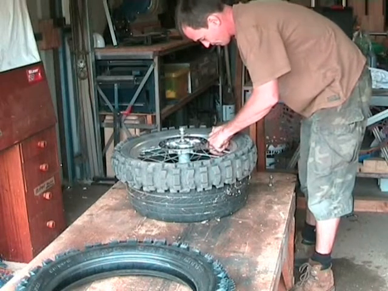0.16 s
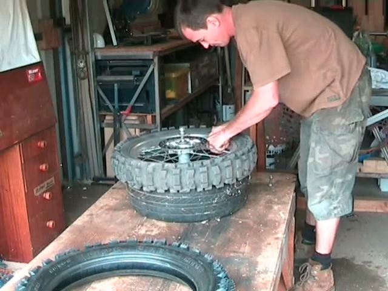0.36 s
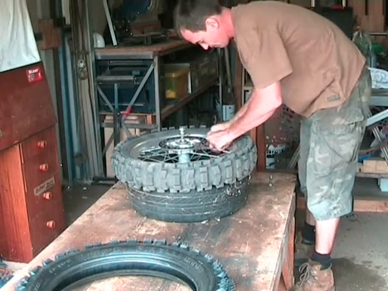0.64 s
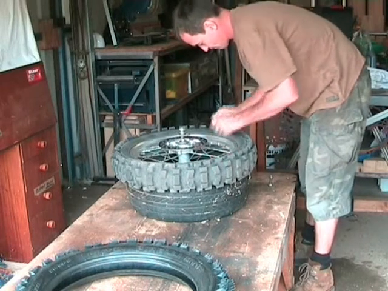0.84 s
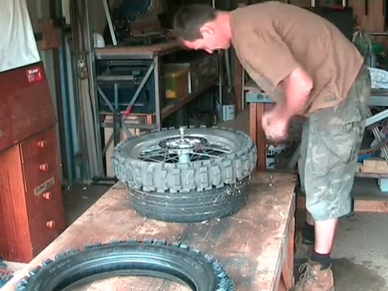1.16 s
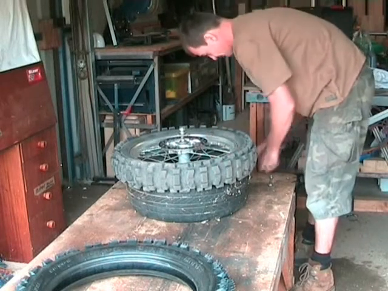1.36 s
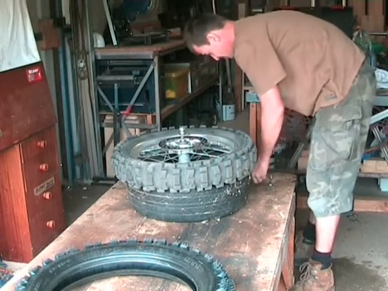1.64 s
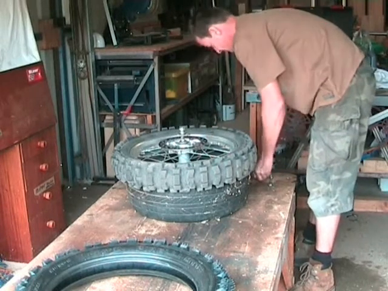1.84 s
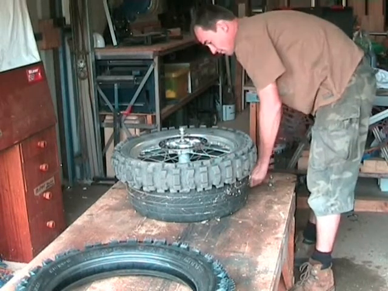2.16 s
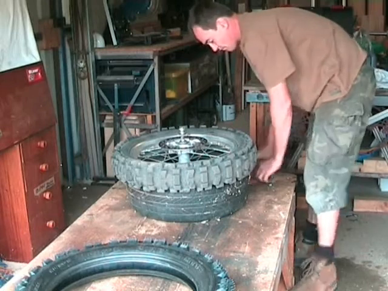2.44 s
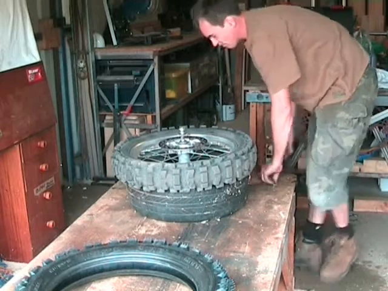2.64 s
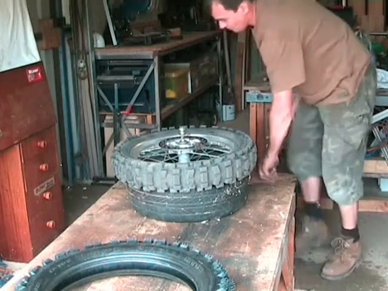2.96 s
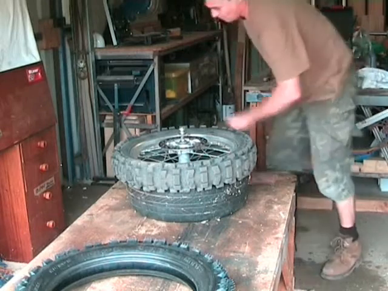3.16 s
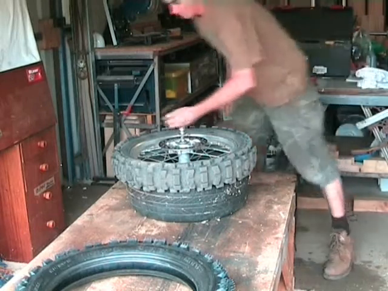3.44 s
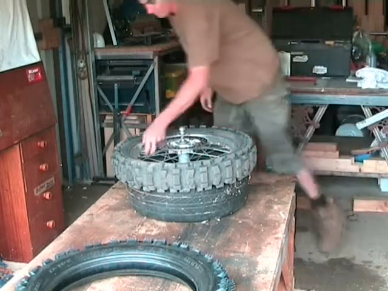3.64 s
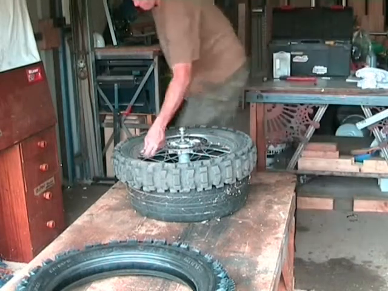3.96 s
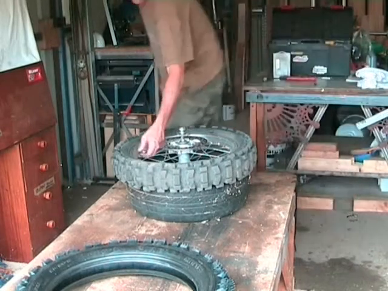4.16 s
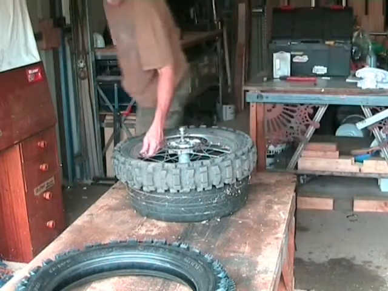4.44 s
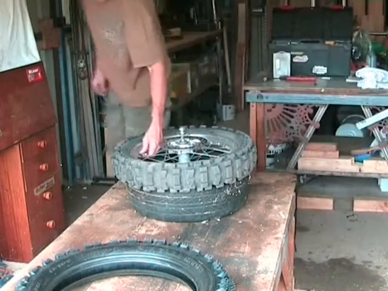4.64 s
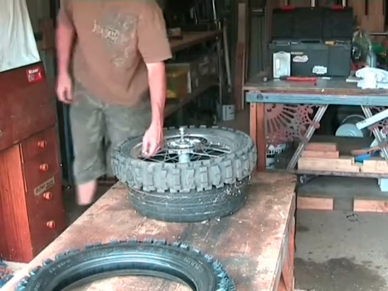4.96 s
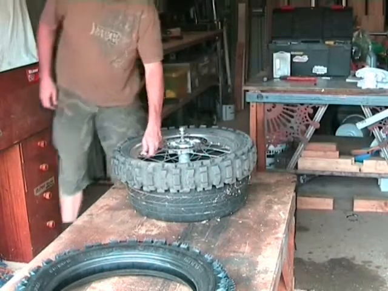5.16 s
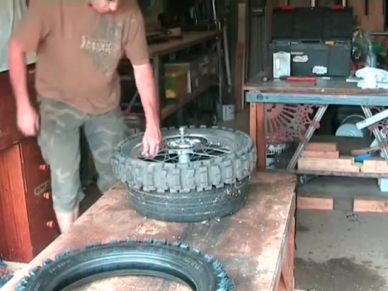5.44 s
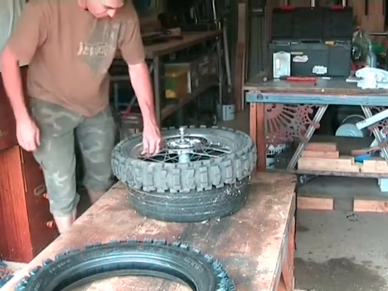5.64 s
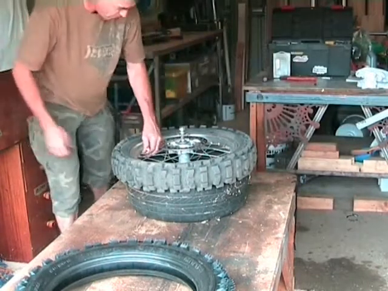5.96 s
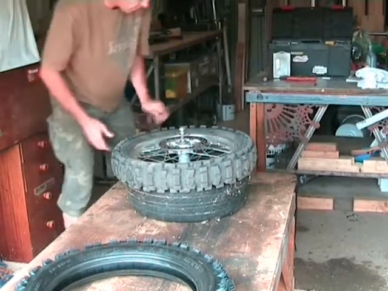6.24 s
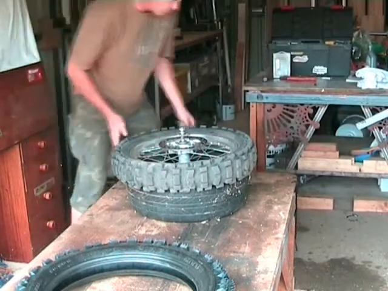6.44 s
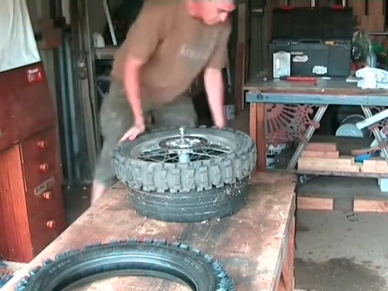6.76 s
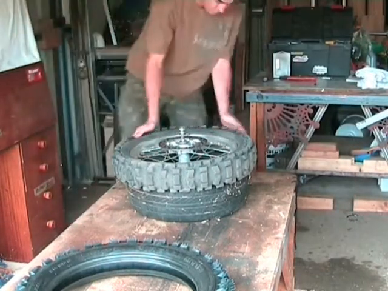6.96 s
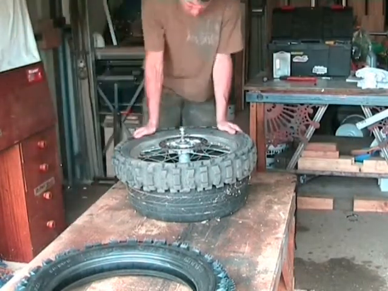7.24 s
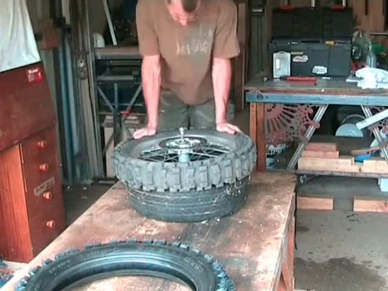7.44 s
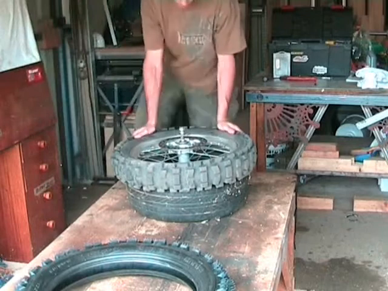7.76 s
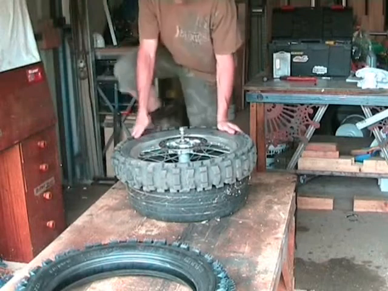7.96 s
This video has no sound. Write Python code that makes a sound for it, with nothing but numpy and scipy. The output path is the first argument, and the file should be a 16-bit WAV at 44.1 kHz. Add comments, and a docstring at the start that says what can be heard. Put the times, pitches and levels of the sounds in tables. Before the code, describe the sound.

In a small workshop, fingers open a tyre valve and air spurts out in rough, breathy bursts with low puffs buffeting the close stereo microphone. The hiss runs free, then fades and dulls into a thin high whistle. A few faint wooden knocks follow. Near the end a hard object topples with a quick bouncing clatter and short metallic squeal, then the tyre is pressed and the whistle swells slightly.

```python
"""Air hisses out of the open valve of a tyre on a wooden workbench: shaped noise fading to a few thin sines.
At first fingers deflect the jet into rougher noise and low puffs of air buffet the microphone.
Light knocks follow, and near the end something hard topples and clatters: noise crunches with ringing modes.
Sliding metal squeals in wavering sines, hands and clothes brush in soft noise, the tyre is bumped,
and a small workshop adds its echoes, steady noise and a low rumble."""
import sys
import numpy as np
from scipy import signal
from scipy.fft import rfft, irfft, next_fast_len
from scipy.io import wavfile
from scipy.ndimage import uniform_filter1d

SR = 44100
rng = np.random.default_rng(int(sys.argv[2]) if len(sys.argv) > 2 else 0)


def dump_mix(stems):
    """Bounce the given channels to the path in sys.argv[1] as a 16-bit WAV at rate SR."""
    frames = np.atleast_2d(stems).T  # one column per channel
    limited = np.clip(frames, -1, 1)  # hard clip at full scale
    pcm = np.round(limited * 32767).astype(np.int16)
    wavfile.write(sys.argv[1], SR, pcm)


N = 356813
T = np.arange(N) / SR

# colour of the low noise in rumble and background: f/Hz, level/dB
LOW_COLOUR = [(20, -31), (55, -11.5), (120, -1.5), (240, -3), (420, -13), (2000, -60)]
# colour of blows by the falling thing and against the tyre: f/Hz, level/dB
BLOW_COLOUR = [(40, -49), (130, -20), (280, 2), (370, -3.5), (620, 5), (900, 0.5), (2500, -1), (4200, -2.5),
               (7000, 4), (13000, -14)]
# ringing modes of those blows: f/Hz, level/dB, t60/s
BODY_RING = [(285.4, -7.5, 0.24), (510, -1.5, 0.2), (780, -4, .15), (1103, -1.5, 0.16), (1490, -5, .16),
             (1592, 0.5, 0.28), (2323, -2.5, 0.17), (3710, -13, .33)]


def amp(db):
    """Decibels to gain."""
    return 10 ** (np.asarray(db) / 20)


def unit(x):
    """Scales to rms 1."""
    return x / np.sqrt(np.mean(x ** 2) + 1e-20)


def at_time(rows, t=T):
    """Reads every column of a curve over time."""
    times, *columns = np.transpose(rows)
    return [np.interp(t, times, column) for column in columns]


def at_hz(rows, hz):
    """Reads a spectrum on a log-frequency axis."""
    f, value = np.transpose(rows)
    return np.interp(np.log(hz + 1), np.log(f + 1), value)


def resonance(hz, centre_hz, width_hz):
    """Bell-shaped peak of height 1."""
    return 1 / (1 + (2 * (hz - centre_hz) / width_hz) ** 2)


def noise(gain, size=N):
    """Noise of rms 1 whose spectrum follows gain(Hz)."""
    n = next_fast_len(size)
    spectrum = rfft(rng.standard_normal(n)) * gain(np.fft.rfftfreq(n, 1 / SR))
    return unit(irfft(spectrum, n)[:size])


def coloured(colour, size=N):
    """Noise of rms 1 with a tabled spectrum."""
    return noise(lambda hz: amp(at_hz(colour, hz)), size)


def wander(rate_hz):
    """Random fluctuation of rms 1, mostly slower than rate_hz."""
    return noise(lambda hz: 1 / (1 + (hz / rate_hz) ** 2))


def tone(hz, waver_hz):
    """A sine of rms 1 whose pitch trembles."""
    pitch_hz = hz + waver_hz * wander(38.5)
    return unit(np.sin(2 * np.pi * np.cumsum(pitch_hz) / SR))


def envelope(rows, attack_s, release_s):
    """Gain of events (start, length, dB) that rise linearly, hold and die away exponentially."""
    gain = np.zeros(N)
    for s, length_s, db in rows:
        attack = np.clip((T - s) / attack_s, 0, 1)
        gain += amp(db) * attack * np.exp(-np.maximum(T - s - length_s, 0) / release_s)
    return gain


def add(mix, s, sound):
    """Mixes a sound in at time s."""
    part = mix[round(s * SR):][:len(sound)]
    part += sound[:len(part)]


def low_cut(x, corner_hz):
    """Cuts the deep bass below corner_hz."""
    return signal.sosfilt(signal.butter(2, corner_hz, "highpass", fs=SR, output="sos"), x)


def ports(a, b):
    """Two unrelated signals become a close microphone pair: alike in the bass, apart in the treble."""
    # f/Hz, likeness of the two ports/0-1
    likeness = [(100, 1), (300, 0.92), (700, 0.77), (1400, 0.95), (2800, 0.6), (13000, 0.1)]
    n = next_fast_len(len(a))
    same = np.clip(at_hz(likeness, np.fft.rfftfreq(n, 1 / SR)), 0, 1)
    mid = rfft(a, n) * np.sqrt((1 + same) / 2)
    side = rfft(b, n) * np.sqrt((1 - same) / 2)
    return irfft(np.array([mid + side, mid - side]), n)[:, :len(a)]


def room(x, early_db, tail_db, early_s, lag_samples):
    """Direct sound, reaching the right port first, then nearby reflections and the workshop's tail."""
    # the workshop's decay: f/Hz, t60/s
    decay = [(150, 0.58), (500, 0.35), (2500, 0.41), (7000, 0.77), (13000, 0.39)]
    size = SR // 2
    t = np.arange(size) / SR
    # sparse random reflections, about 2500 a second, after a short gap
    taps = rng.choice([-1., 1.], (4, size)) * (rng.random((4, size)) < 2500 / SR) * (t > .0015)
    early = ports(*taps[:2]) * np.exp(-t / early_s)
    hz, frame_s, z = signal.stft(ports(*taps[2:]), SR, nperseg=256)
    fade = np.exp(-np.log(1000) * frame_s / at_hz(decay, hz)[:, None])
    tail = signal.istft(z * fade, SR, nperseg=256)[1][:, :size]
    echo = amp(early_db) * early / np.linalg.norm(early[0])
    echo += amp(tail_db) * tail / np.linalg.norm(tail[0])
    # the direct sound, with a fractional delay at the left port
    echo[:, :16] += np.sinc(np.arange(16) - 8 - np.array([[lag_samples], [0]]))
    return signal.fftconvolve(x[None], echo / np.linalg.norm(echo[0]), axes=1)[:, :N]


def widened(pair):
    """Scales the difference between the ports: the hiss starts narrow and spreads."""
    # t/s, gain of the difference/dB
    width = [(1.6, -5.5), (2.0, 4.5), (5.0, 4), (8.09, 3)]
    mid = (pair[0] + pair[1]) / 2
    side = (pair[0] - pair[1]) / 2 * amp(at_time(width)[0])
    return np.array([mid + side, mid - side])


def background(level_db=-50, rise_db_per_s=0.58, whirr_db=-55.5):
    """The workshop's noise slowly comes up, with a faint narrow band and low noise opposed at the ports."""
    # colour of the steady noise: f/Hz, level/dB
    ambience = [(20, -16), (130, 3.5), (1000, -1), (1600, -10), (8000, -23.5), (13000, -30)]
    # colour of the faint narrow band: f/Hz, level/dB
    whirr = [(800, -9.5), (1250, -1.5), (1600, -21), (5000, -50)]
    # low opposed noise: t/s, level/dB
    low_spread = [(2.6, -69), (5.5, -47.5), (8.09, -45)]
    opposed = amp(whirr_db) * coloured(whirr) + amp(at_time(low_spread)[0]) * coloured(LOW_COLOUR)
    steady = ports(coloured(ambience), coloured(ambience)) * amp(level_db + rise_db_per_s * T)
    return steady + np.array([opposed, -opposed])


def rumble(lumpy_db=1.0):
    """An uneven low rumble comes and goes in the second half."""
    # start/s, length/s, level/dB
    rumbles = [(4.5, 3.4, -50.5), (5.04, 0.073, -49), (5.7, 0.31, -48.5)]
    lumps = unit(amp(lumpy_db * wander(18)))
    return coloured(LOW_COLOUR) * envelope(rumbles, attack_s=0.063, release_s=0.19) * lumps


def buffet(gust_db=2.8, opposed_db=-2.0, corner_hz=90, still_db=-75, puff_s=0.021):
    """Lumpy low puffs of moving air; the deepest eddies push the two ports in opposite senses."""
    # colour of the moving air: f/Hz, level/dB
    air_colour = [(20, -32), (50, -4), (110, 3), (220, -3), (400, -15.5), (2000, -84)]
    # draught under the puffs, dying away as the jet weakens: start/s, length/s, level/dB
    draughts = [(0.43, 2.14, -51.5)]
    # t/s, level/dB, opposed against common motion/dB
    puffs = [(.39, -44, 11), (.53, -47, 13), (.645, -37, 2), (.8, -31.5, 3), (.865, -36, 0.5),
             (.93, -39.5, 3), (1.02, -41, -3), (1.145, -42.5, 1), (1.21, -39.5, -1), (1.303, -38.5, -1),
             (1.495, -39, -1), (1.625, -38.5, 3), (1.68, -41, 4)]
    common_power = amp(still_db) ** 2 + envelope(draughts, attack_s=0.16, release_s=0.19) ** 2
    opposed_power = common_power * amp(opposed_db) ** 2
    for s, db, against_db in puffs:
        puff = amp(db) ** 2 * np.exp(-((T - s) / puff_s) ** 2)
        common_power = common_power + puff
        opposed_power = opposed_power + puff * amp(against_db) ** 2

    def deep_colour(hz):
        return amp(at_hz(air_colour, hz)) * (1 + 3 / (1 + (hz / corner_hz) ** 4))

    gusts = unit(amp(gust_db * wander(29)))
    common = coloured(air_colour) * np.sqrt(common_power)
    opposed = noise(deep_colour) * np.sqrt(opposed_power)
    return gusts * np.array([common + opposed, common - opposed])


def brushing():
    """Hands and clothes brush past in short washes of bright noise."""
    # f/Hz, level/dB
    brush_colour = [(200, -24), (1500, 18), (10500, 16), (13000, -13.5)]
    # start/s, length/s, level/dB
    brushes = [(6.645, 0.015, -36), (7.44, 0.06, -44)]
    return coloured(brush_colour) * envelope(brushes, attack_s=0.011, release_s=0.04)


def blows(rows, colour, ring_modes, ring_db, detune, rise_s, rattle_db, rattle_s, spot_db, spot_width_hz):
    """Each blow is a crunch and grainy rattle, coloured by the struck spot, plus the whole body's ring."""
    out = np.zeros(N)
    t = np.arange(SR // 2) / SR
    mode_hz, mode_db, t60 = np.transpose(ring_modes)[:, :, None]
    for s, db, edge_hz, contact_s, spot_hz in rows:
        chatter = unit(noise(lambda hz: 1 / (1 + (hz / 150) ** 4), len(t)) ** 2)
        contact = np.exp(-t / contact_s) + amp(rattle_db) * chatter * np.exp(-t / rattle_s)

        def struck_colour(hz):
            peak_db = spot_db * resonance(hz, spot_hz, spot_width_hz)
            return amp(at_hz(colour, hz) + peak_db) / np.sqrt(1 + (hz / edge_hz) ** 8)

        crunch = noise(struck_colour, len(t)) * contact
        # a longer contact carries more energy
        crunch *= np.sqrt(contact_s * SR / 2) / np.linalg.norm(crunch)
        struck_hz = mode_hz * (1 + detune * rng.standard_normal(mode_hz.shape))
        swing = np.sin(2 * np.pi * (struck_hz * t + rng.random(mode_hz.shape)))
        ring = (amp(mode_db) * np.exp(-np.log(1000) * t / t60) * swing).sum(0)
        add(out, s, amp(db) * (crunch + amp(ring_db) * ring) * (1 - np.exp(-t / rise_s)))
    return out


def bumps():
    """Dull bumps against the tyre, with hardly any ring."""
    # t/s, relative level/dB, upper edge f/Hz, contact decay/s, struck spot f/Hz
    hits = [(6.665, -19.5, 3050, 0.0067, 695), (7.414, -34.5, 2450, 0.014, 690),
            (7.484, -19, 2360, 0.0076, 2080)]
    return amp(2.0) * blows(hits, BLOW_COLOUR, BODY_RING, ring_db=-34, detune=0.03, rise_s=0.0014,
                            rattle_db=-28, rattle_s=0.025, spot_db=11, spot_width_hz=120)


def knocks():
    """Small things put down on the bench excite its short wooden ring."""
    # t/s, relative level/dB, upper edge f/Hz, contact decay/s, struck spot f/Hz
    hits = [(2.271, -21, 1750, 0.0081, 1400), (2.650, -28, 1400, 0.0078, 560), (2.704, -37, 900, .012, 505),
            (2.749, -32, 1000, 0.0076, 590), (2.826, -37, 700, 0.026, 530), (2.974, -38, 1700, 0.081, 640),
            (4.049, -37, 2900, 0.017, 1144)]
    # f/Hz, level/dB
    knock_colour = [(100, -18), (370, -13), (500, 9), (720, -0.5), (1400, 6.5), (10000, -20)]
    # f/Hz, level/dB, t60/s
    bench_ring = [(509, -7, 0.2), (1070, -1, 0.04), (1544, -3, 0.04)]
    return amp(2.5) * blows(hits, knock_colour, bench_ring, ring_db=-2.5, detune=0.02, rise_s=0.00065,
                            rattle_db=-28, rattle_s=0.058, spot_db=0.5, spot_width_hz=370)


def clatter():
    """The falling thing bounces, each blow a hard crunch with a faint ring of its body."""
    # t/s, relative level/dB, upper edge f/Hz, contact decay/s, struck spot f/Hz
    bounces = [(6.832, -2.5, 2100, 0.0072, 1050), (6.857, -4.5, 3000, 0.0095, 2650),
               (6.867, -8, 2600, .005, 626), (6.887, -8.5, 3900, .006, 3050),
               (6.928, -5, 3220, 0.011, 2380), (6.948, -11, 3000, 0.0045, 2290),
               (6.972, -4, 1920, 0.0038, 880), (7.012, -20, 3200, 0.032, 1600),
               (7.037, -8.5, 2800, 0.0068, 600), (7.054, -8.5, 3100, 0.0092, 1455),
               (7.095, -7.5, 3030, .008, 1100), (7.108, -14.5, 2400, .007, 1150),
               (7.135, -14, 2380, 0.013, 1070)]
    return amp(2.5) * blows(bounces, BLOW_COLOUR, BODY_RING, ring_db=-19.5, detune=0.003, rise_s=0.0014,
                            rattle_db=-18.5, rattle_s=0.032, spot_db=6, spot_width_hz=310)


def settling(body_hz=510):
    """The fallen thing lands on its low body note and shudders with a resonant buzz as it settles."""
    # start/s, length/s, level/dB
    shudders = [(7.095, 0.11, -30)]
    # resonances that buzz: f/Hz, width/Hz, level/dB
    buzz_peaks = [(510, 46, 7.5), (1620, 350, -3), (3740, 490, -5.5)]
    buzz = noise(lambda hz: sum(amp(db) * resonance(hz, f, width) for f, width, db in buzz_peaks))
    body = tone(body_hz, waver_hz=12.3) * envelope([(7.095, 0.0087, -19)], attack_s=0.0044, release_s=0.035)
    return body + buzz * envelope(shudders, attack_s=.01, release_s=0.016)


def squeal():
    """Thin, nearly pure tones of metal sliding between bounces."""
    # start/s, length/s, level/dB
    slides = [(6.955, 0.071, -33.5), (7.095, 0.064, -44.5)]
    # f/Hz, level/dB
    squeal_tones = [(6460, -12), (6977, -1)]
    tones = sum(amp(db) * tone(hz, waver_hz=11.0) for hz, db in squeal_tones)
    return tones * envelope(slides, attack_s=0.042, release_s=0.023)


def pressed(start_s=7.37, rise_s=0.37):
    """Leaning on the tyre squeezes more air out: the weight on it, 0-1."""
    return np.clip((T - start_s) / rise_s, 0, 1)


def chirp(pitch_hz=8877):
    """The valve briefly catches a higher note."""
    return tone(pitch_hz, waver_hz=15) * envelope([(5.14, 0.083, -43.5)], attack_s=0.036, release_s=.025)


def whistle(sing_db=-53.5, grown_s=1.8, growth_db_per_s=4, press_db=4):
    """The slowing flow sings in close, beating tones that grow, hold, and swell under pressure."""
    # f/Hz, relative level/dB
    whistle_tones = [(5170, -11), (5265, -1), (5367, -2), (5394, 0), (6608, -18), (8592, -19)]
    level_db = sing_db - growth_db_per_s * np.maximum(grown_s - T, 0) + press_db * pressed()
    return unit(sum(amp(db) * tone(hz, waver_hz=8.4) for hz, db in whistle_tones)) * amp(level_db)


def splash(flutter_db=-1.0):
    """Fingers in the jet break it into a lower, rougher rush."""
    # f/Hz, level/dB
    splash_colour = [(300, -25), (750, -13.5), (1500, -4), (2700, -4), (4000, -8.5), (8000, -3.5),
                     (13000, -50)]
    # start/s, length/s, level/dB
    splashes = [(0.0, 0.057, -41), (.345, 0.013, -25), (.39, 0.039, -25), (.69, 0.038, -25.5),
                (.73, 0.081, -24.5), (.825, 0.046, -30)]
    rush = coloured(splash_colour) * envelope(splashes, attack_s=0.0086, release_s=0.037)
    return rush * amp(flutter_db * wander(40))


def jet(level_db=3.5, top_db=1.5, flutter_db=0.8, patchy_db=0.66, treble_waver_db=1.0, press_db=1.5):
    """Turbulent hiss fades and dulls with falling pressure, as the valve stem's resonances sink into it."""
    # colours of the jet at full and at slack pressure, and through the barely open valve: f/Hz, level/dB
    full = [(300, -32.5), (800, -27), (1400, -13.5), (2100, -13), (2600, -8.5), (3500, -11.5), (6400, -5.5),
            (7500, 0.5), (8500, -0.5), (10400, -1), (11500, -2.5), (13000, -19.5)]
    slack = [(300, -13), (1500, -4), (3500, -5.5), (4400, 3.5), (5900, -4.5), (7200, -4.5), (8700, 4.5),
             (9800, 0.5), (11200, -5), (12500, -23)]
    pinched = [(300, -29), (1500, -4.5), (3600, -9.5), (6600, -1.5), (7400, 6), (8600, 1.5), (13000, -11)]
    # when the full and slack colours are reached: t/s
    stage_s = [0.91, 4.46]
    # resonances of the valve stem: f/Hz, width/Hz, rise/dB
    stem = [(3050, 130, 6.5), (7700, 81, 1)]
    # valve worked by the fingers: t/s, relative jet level/dB, relative top treble/dB
    opening = [(0.0, -37.5, -5), (0.1, -43, -2), (0.14, -30.5, -2.5), (0.342, -35, -3), (0.354, -27, -7),
               (0.416, -18, -14), (0.5, -25.5, -3.5), (0.556, -21.5, -8), (0.612, -22, 1),
               (0.73, -21, -7.5), (0.84, -31, 1.5), (0.97, -29.5, -10), (1.03, -27, -6.5),
               (1.202, -25.5, -3.5), (1.45, -25.5, -5)]
    # brief surges of the treble: t/s, rise/dB
    surges = [(2.15, 4), (2.62, 8), (3.05, 7.5), (3.47, 3), (4.25, 5), (4.87, 4), (5.42, 4)]
    forced_s, free_s = 0.38, 1.65  # valve forced open; valve runs free
    fade_db_per_s, trickle_db = 5.0, -53.5  # fade down to a last trickle, before level_db
    dull_db, dull_s, surge_s = 4.5, 0.31, 0.073

    hz, t, z = signal.stft(rng.standard_normal(N), SR, nperseg=512)
    emptied = np.interp(t, stage_s, np.arange(2))
    open_db = at_hz(full, hz)[:, None] * (1 - emptied) + at_hz(slack, hz)[:, None] * emptied
    stem_db = sum(db * resonance(hz, f, width) for f, width, db in stem)[:, None] * (1 - emptied)
    gain = amp(np.where(t < forced_s, at_hz(pinched, hz)[:, None], open_db + stem_db))
    gain = gain / np.sqrt(np.mean(gain ** 2, axis=0))

    dulling_db = dull_db * (1 - np.exp(-np.maximum(t - free_s, 0) / dull_s))
    sharp_db = at_time(opening, t)[1] + top_db - dulling_db
    surge_db = sum(db * np.exp(-((t - s) / surge_s) ** 2) for s, db in surges)
    surge_db = surge_db + treble_waver_db * np.interp(t, T, wander(20.0))
    treble_db = np.clip((hz[:, None] - 8200) / 2400, 0, 1) * sharp_db
    treble_db = treble_db + np.clip((hz[:, None] - 5000) / 5000, 0, 1) * surge_db

    # eddies: random patches smoothed over frequency, then time
    patches = uniform_filter1d(rng.standard_normal(z.shape), size=9, axis=0)
    eddies = unit(uniform_filter1d(patches, size=24, axis=1))
    gain = gain * amp(treble_db + patchy_db * eddies)
    hiss = signal.istft(z * gain, SR, nperseg=512)[1][:N]

    leaked_db = fade_db_per_s * np.maximum(T - free_s, 0)
    flow_db = np.maximum(at_time(opening)[0] - leaked_db, trickle_db)
    return hiss * amp(flow_db + press_db * pressed() + level_db + flutter_db * wander(3.1))


def scene():
    """All sources in the workshop."""
    near = room(knocks() + low_cut(bumps(), corner_hz=110),
                early_db=-37, tail_db=-3.5, early_s=0.01, lag_samples=0.92)
    far = room(low_cut(clatter() + settling(), corner_hz=110),
               early_db=-23.0, tail_db=-4.5, early_s=0.0052, lag_samples=1.55)
    singing = room(whistle() + chirp() + squeal(),
                   early_db=-28, tail_db=-18, early_s=0.013, lag_samples=0.27)
    air = room(jet() + splash() + brushing(),
               early_db=-9, tail_db=-9.0, early_s=0.022, lag_samples=0.69)
    return background() + rumble() + buffet() + near + far + singing + widened(air)


def record(dry, edge_hz=13000):
    """Any peaks beyond full scale clip; then a low-pass limits the band."""
    clipped = np.clip(dry, -1, 1)
    band_limit = signal.firwin(255, edge_hz, window=("kaiser", 9), fs=SR)
    return signal.oaconvolve(clipped, band_limit[None], "same")


dry = scene()
out = record(dry)
dump_mix(out)
```